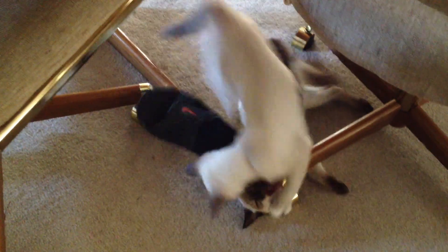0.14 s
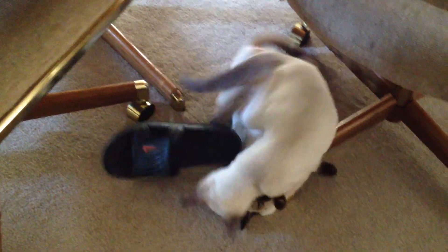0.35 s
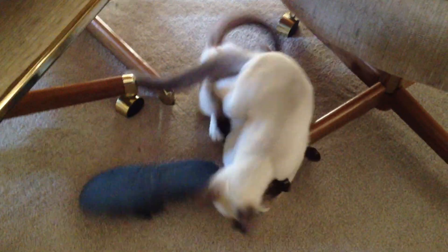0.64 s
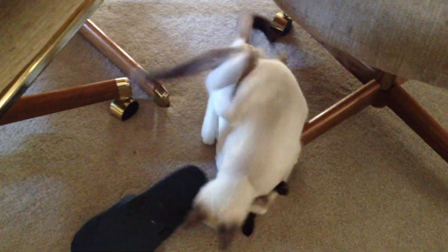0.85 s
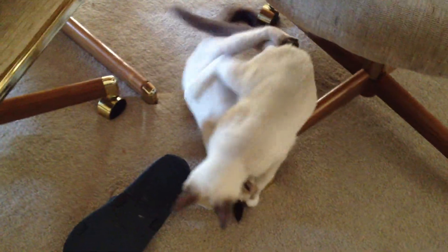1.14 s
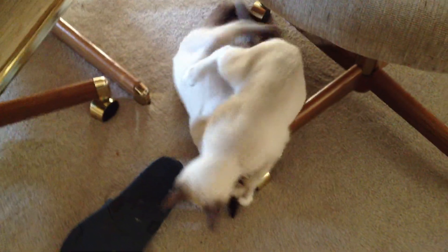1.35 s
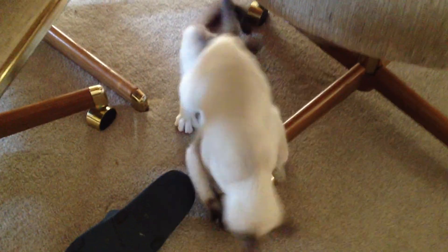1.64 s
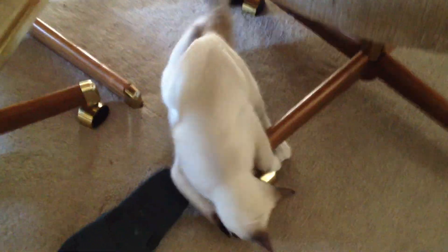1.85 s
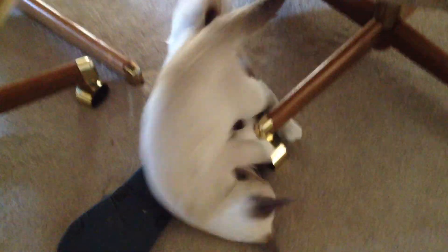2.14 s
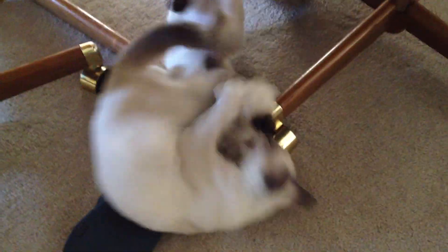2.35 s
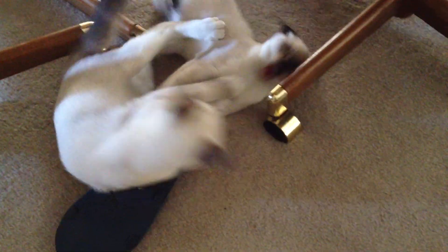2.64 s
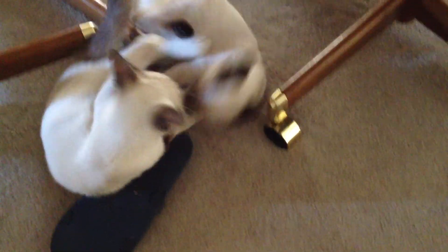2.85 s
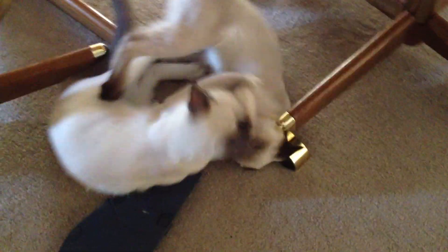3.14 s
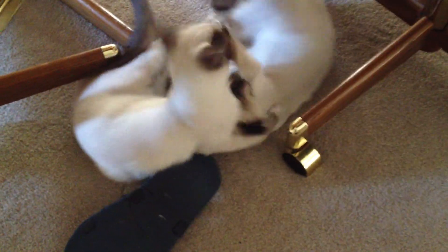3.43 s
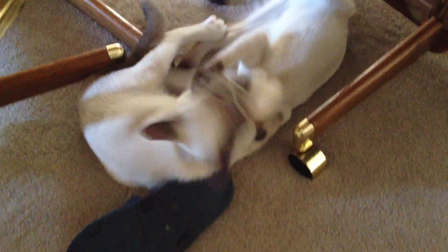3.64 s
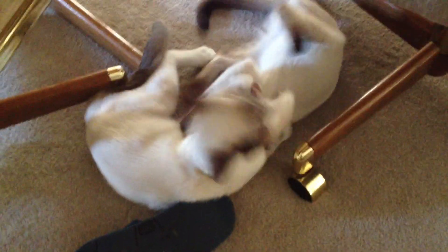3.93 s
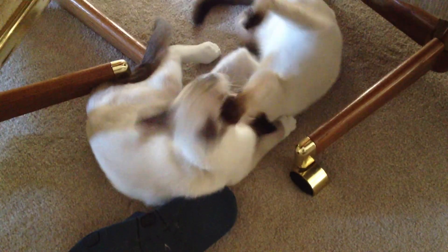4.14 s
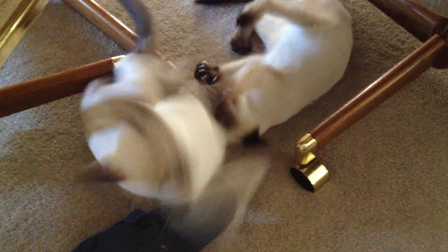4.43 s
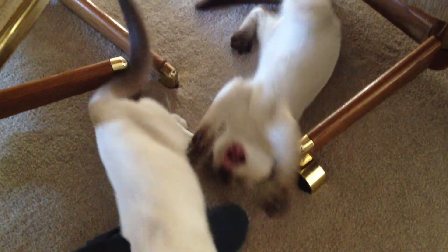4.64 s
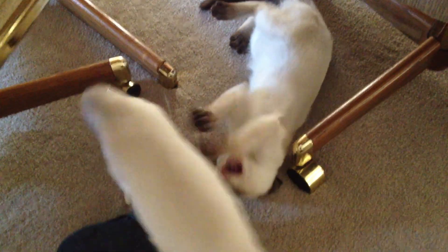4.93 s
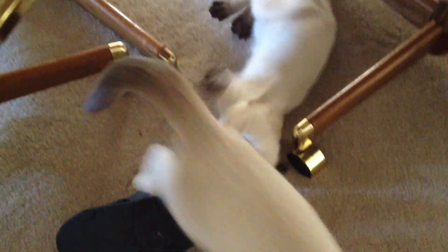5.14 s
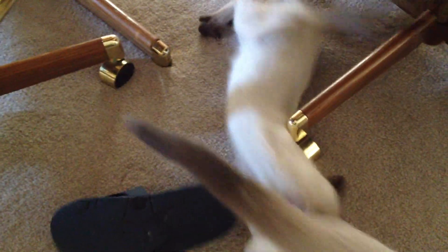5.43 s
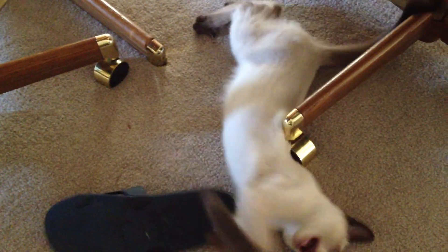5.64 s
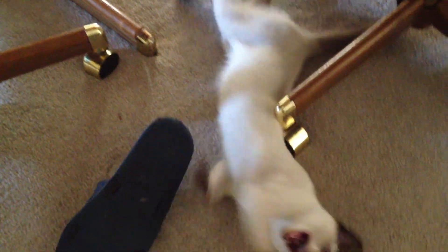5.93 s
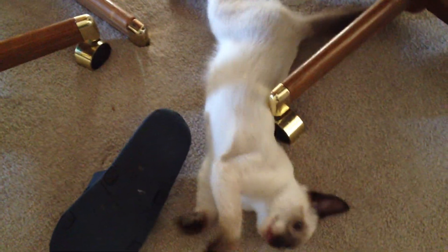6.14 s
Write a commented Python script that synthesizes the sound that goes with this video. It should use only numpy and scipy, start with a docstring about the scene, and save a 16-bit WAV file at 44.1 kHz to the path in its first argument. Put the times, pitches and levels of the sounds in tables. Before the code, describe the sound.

Two cats wrestle on a carpet among wooden furniture legs. A metal caster clacks as one cat starts a long yowl that rises, sinks and turns raspy. Scuffling follows, with two sharp, briefly ringing knocks on the legs, another clack, a further knock and a dull thud. Fur rustles and claws tick throughout, and a faint short hiss ends the bout. The sounds are close, in a quiet furnished room.

```python
"""Paws thud and fur rubs on a carpet as two cats wrestle among wooden furniture legs on brass casters.
One gives a long yowl, vocal-fold harmonics filtered by throat and mouth, that rises, sinks and frays
into a rasp as its force runs out. Casters clack, claws snag, a body drags over the pile, and knocks set
the legs ringing in their modes. A thin squeak slips out, and a short soft hiss of turbulent breath
ends the bout, in a quiet furnished room."""
import sys
import numpy as np
from scipy import signal
from scipy.fft import rfft, irfft
from scipy.io import wavfile

SR = 44100
rng = np.random.default_rng(int(sys.argv[2]) if len(sys.argv) > 2 else 0)


def to_wav(s):
    """Save 16-bit WAV."""
    ch = np.atleast_2d(s).T  # columns
    pcm = np.round(np.clip(ch, -1, 1) * 32767)  # PCM
    wavfile.write(sys.argv[1], SR, pcm.astype(np.int16))


N = 276948
TIME = np.arange(N) / SR

# bright noise spectrum of fur on the pile, also used for the casters' rattle: frequency_hz, density_db
BRIGHT_FRICTION = [(500, -4.5), (2300, 2), (4300, -6.5), (5500, -4.5), (6900, 9), (8500, -2), (14000, 2.5)]


def from_db(db):
    """Decibels to amplitude gain."""
    return 10 ** (np.asarray(db) / 20)


def rms_one(x):
    """Normalisation to unit rms."""
    return x / np.sqrt(np.mean(x ** 2) + 1e-20)


def in_time(rows):
    """Linear interpolation of each column of a timed table at every sample."""
    times, *columns = np.transpose(rows)
    return [np.interp(TIME, times, column) for column in columns]


def at_hz(points, hz, column=1):
    """Interpolation of one column of a spectrum on a log-frequency axis."""
    points = np.array(points)
    return np.interp(np.log(hz), np.log(points[:, 0]), points[:, column])


def during(start_s, end_s, fade_s=0.004):
    """A trapezoidal gate: one between two moments, with a fade at each end."""
    return np.clip(np.minimum(TIME - start_s, end_s - TIME) / fade_s, 0, 1)


def swell(middle_s, half_s):
    """A Gaussian envelope about a moment."""
    return np.exp(-((TIME - middle_s) / half_s) ** 2)


def decay(t, t60):
    """Exponential decay: 60 dB lost in t60 seconds."""
    return np.exp(-np.log(1000) * t / t60)


def after(start_s, length_s):
    """The samples that follow a moment, and the time since it."""
    span = slice(int(start_s * SR), min(N, int((start_s + length_s) * SR)))
    return span, TIME[span] - TIME[span.start]


def drift(rate_hz):
    """Low-passed noise: a random wander of unit rms at about this rate."""
    pole = np.exp(-16 * np.pi * rate_hz / SR)   # runs at an eighth of the sample rate
    slow = signal.lfilter([1], [1, -2 * pole, pole * pole], rng.standard_normal(N // 8 + 8002))[8000:]
    return np.interp(np.arange(N) / 8, np.arange(len(slow)), rms_one(slow))


def filtered(x, order, hz, kind):
    """Causal Butterworth filtering."""
    return signal.sosfilt(signal.butter(order, hz, kind, fs=SR, output="sos"), x)


def noise_bands():
    """White noise in third-octave bands, as pairs of centre_hz and samples."""
    edges, white = np.geomspace(30, 17000, 28), rng.standard_normal((2, N))
    return [(np.sqrt(low * high), filtered(white[k % 2], 2, [low, high], "band"))
            for k, (low, high) in enumerate(zip(edges, edges[1:]))]


def coloured(spectrum):
    """Spectral shaping: noise of unit rms with this spectrum."""
    hz = np.maximum(np.arange(N // 2 + 1) * SR / N, 1)
    return rms_one(irfft(rfft(rng.standard_normal(N)) * from_db(at_hz(spectrum, hz)), N))


def formant_gain(formants, hz):
    """Resonance: the summed gain of bell-shaped peaks at these frequencies."""
    return sum(from_db(db) / (1 + ((hz - centre) / width * 1.17) ** 2) for centre, width, db in formants)


def breath(formants):
    """Turbulence noise of unit rms, filtered by vocal-tract resonances."""
    hz = np.geomspace(100, 16000, 200)
    return coloured(np.c_[hz, 20 * np.log10(formant_gain(formants, hz))])


def room_tone(level_db=-63):
    """Stationary noise: the faint background of the room."""
    # spectrum of the quiet room: frequency_hz, density_db
    spectrum = [(30, -8), (60, -45), (108, -8.5), (224, 0.5), (378, -11.5), (503, -9), (745, -14),
                (2060, -19.5), (3300, -23), (7040, -21.5), (9600, -20), (14200, -14), (15400, -18)]
    return from_db(level_db) * coloured(spectrum)


def rubbing(fidget_hz=5.8, swing_db=6, lumpy_db=4.5, grainy_db=6.5):
    """Stick-slip friction: fur catches and slips on the pile, so the noise comes in uneven lumps."""
    # bodies sliding over the pile: middle_s, half_length_s, fur_db, weight_db
    slides = [(0.097, 0.064, -79.5, -49.5), (0.373, 0.088, -68, -49), (1.87, 0.47, -82, -69),
              (2.326, 0.032, -70, -68), (2.5, 0.082, -72, -74), (3.2, 0.2, -84, -55.5),
              (3.75, 0.16, -74, -64), (4.025, 0.064, -67, -88), (4.33, 0.022, -72.5, -84),
              (4.454, 0.035, -70.5, -78), (4.675, 0.027, -71.5, -54.5), (5.2, 0.046, -81, -60),
              (5.506, 0.074, -74, -54.5), (5.779, 0.018, -68, -72)]
    # dull spectrum of shifting weight: frequency_hz, density_db
    shuffle_spectrum = [(60, -69), (120, -2), (210, -4.5), (330, -2.5), (550, -12.5), (1200, -17),
                        (3000, -27)]
    fidget_db = swing_db * np.tanh(drift(fidget_hz))   # the cats never keep quite still
    fur = from_db(-82.5 + fidget_db) + sum(from_db(db) * swell(s, half) for s, half, db, _ in slides)
    weight = from_db(-65.5 + fidget_db) + sum(from_db(db) * swell(s, half) for s, half, _, db in slides)
    shuffle = coloured(shuffle_spectrum) * weight * from_db(-13 + lumpy_db * drift(23))
    rustle = coloured(BRIGHT_FRICTION) * fur * from_db(7 + grainy_db * np.tanh(drift(83)))
    return shuffle + rustle


def paw_thuds(slap_rise_s=0.003, thump_rise_s=0.023, sink_s=0.00217, spot_spread=0.03):
    """Impact excitation: the pad slaps the floor's high modes, then the weight drives its low ones."""
    # paws and bodies landing on the carpet: start_s, thump_db, slap_db
    landings = [(.053, -52, -48.5), (.073, -42, -74), (.178, -49, -47), (.325, -42, -48),
                (.375, -40.5, -46.5), (1.506, -76, -37), (1.525, -38.5, -83), (1.769, -63.5, -49),
                (3.203, -42.5, -76), (3.794, -46, -61), (3.837, -51.5, -53.5), (3.904, -32.5, -38),
                (4.5361, -25.5, -28), (4.588, -45, -70), (4.844, -52, -75), (5.448, -55, -44.5),
                (5.515, -52, -54), (5.655, -53, -65), (5.841, -53, -53.5)]
    # modes of the carpeted floor: frequency_hz, level_db, t60_s
    floor_modes = [(187, -7.5, 0.11), (221.6, 5.5, 0.037), (347.5, -11, 0.082), (591.4, -1.5, 0.019),
                   (757, -4, 0.018), (990, -4.5, 0.019), (1180, -4, 0.015), (1820, -18.5, 0.019)]
    out = np.zeros(N)
    for start_s, thump_db, slap_db in landings:
        for hz, mode_db, t60 in floor_modes:
            heavy = hz < 420
            span, t = after(start_s + sink_s * heavy, .2)
            level_db, rise_s = (thump_db + 1.5, thump_rise_s) if heavy else (slap_db + 3.5, slap_rise_s)
            tuning = 1 + rng.normal(0, spot_spread)   # each spot rings a little differently
            ring = np.sin(2 * np.pi * hz * tuning * t) * decay(t, t60)
            out[span] += from_db(level_db + mode_db) * ring * (1 - decay(t, rise_s))
    return filtered(out, 4, 140, "high")   # the thuds carry little deep bass


def roughness(throat_db, mouth_db, firm_rasp=0.1386, full_force_db=-45, doubling_db=7.5):
    """Aperiodic phonation, from 0 to 1: the weaker the voice, the less evenly the folds beat."""
    force_db = 20 * np.log10(np.hypot(from_db(throat_db), from_db(mouth_db)))
    return np.clip(firm_rasp * 2 ** ((full_force_db - force_db) / doubling_db), 0, 1)


def yowl(jitter=0.0113, rough_jitter=0.0464, shimmer=0.55, period_doubling=0.083, clear_hz=5700):
    """Source and filter: vocal-fold harmonics glide through the formants of throat and mouth."""
    # vibration rate of the folds: time_s, pitch_hz
    melody = [(.21, 724), (.28, 777), (.32, 889), (.38, 884.4), (.414, 1042), (.475, 1097), (.526, 1017),
              (.556, 864), (.626, 790), (.7, 663), (.82, 611), (.86, 642), (1.0, 617.7), (1.075, 586),
              (1.125, 516), (1.16, 498.5), (1.22, 540.4), (1.27, 509.5), (1.45, 476), (1.49, 533),
              (1.65, 549.6)]
    # force of the voice and of the overtones the open mouth lets out: time_s, throat_db, mouth_db
    force = [(0.215, -59.5, -73), (.29, -63.5, -58), (.358, -62.5, -51), (.475, -54, -54.5),
             (.584, -49, -58.5), (.7, -53, -67.5), (.77, -57, -58.5), (.83, -61, -61.5), (.996, -51, -63),
             (1.04, -56, -80), (1.102, -56, -84), (1.133, -45, -69.5), (1.3, -45.5, -74), (1.37, -53, -89),
             (1.459, -58.5, -80), (1.659, -65, -86)]
    # formants of throat and mouth before tuning: centre_hz, width_hz, gain_db
    throat = [(1250, 750, -8), (2300, 194, 3.5), (2505, 210, 1.5)]
    mouth = [(4356, 230, -3.5), (7000, 2200, -13.5)]
    # the jaw tunes the throat's formants: time_s, frequency_ratio
    jaw_tuning = [(.25, 1.02), (.45, 0.77), (.57, 1.09), (.66, 0.97), (.9, 0.92), (1.06, 0.96), (1.6, 0.87)]
    start_s, end_s = force[0][0], force[-1][0]
    span, _ = after(0, end_s)
    throat_db, mouth_db = in_time(force)
    rasp = roughness(throat_db, mouth_db)
    pitch = in_time(melody)[0] * (1 + jitter * drift(47) + rough_jitter * rasp * drift(220))
    phase = 2 * np.pi * np.cumsum(pitch) / SR
    # strained folds beat strong and weak in turn
    flutter = 1 + rasp * (shimmer * drift(110) + period_doubling * np.cos(phase / 2))
    harmonics = np.arange(1, 17)[:, None]
    partials, partial_hz = np.sin(harmonics * phase[span]), harmonics * pitch[span]
    # as the head twists, each harmonic swells and fades on its own, the high ones more
    waver = from_db(.8 * np.log2(2 * harmonics) * np.array([drift(40)[span] for _ in harmonics]))
    rolloff = np.sqrt(1 + (partial_hz / clear_hz) ** 8)
    tone_share = np.sqrt(1 - .7 * rasp[span] ** 2)   # a rough tone breaks up into air
    jaw = in_time(jaw_tuning)[0][span]
    lips = (pitch[span] / 850) ** .16   # the lips draw back on high notes
    out = np.zeros(N)
    for formants, tuning, level_db, air_gain in ((throat, jaw, throat_db, .57), (mouth, lips, mouth_db, 1.3)):
        gains = formant_gain(formants, partial_hz / tuning) * waver / rolloff
        tone = np.sum(gains * partials, axis=0) / np.sqrt(np.sum(gains ** 2, axis=0) / 2)
        air = air_gain * rasp * breath(formants) * (1 + .5 * np.cos(phase))   # one puff a cycle
        out[span] += (tone_share * tone * flutter[span] + air[span]) * from_db(level_db[span])
    return out * during(start_s, end_s)


def caster_clacks(rattle_db=-17, rattle_t60=0.056, rise_s=0.012):
    """Free vibration: a caster is knocked, then rings and rattles briefly."""
    # clacks of the casters: start_s, level_db, pitch_ratio, ring_time_ratio
    clacks = [(0.2593, -23.5, 1.0, 0.73), (3.374, -39.5, 1.51, 0.98)]
    # modes of a brass caster: frequency_hz, level_db, t60_s
    modes = [(1373, -22, 0.03), (2543, 4.5, 0.019), (4020, 1, 0.011), (4080, -10, 0.025),
             (4310, 2.5, 0.011), (6110, -7, 0.0091), (7450, -4, 0.022), (8300, -5, 0.022),
             (8540, 4.5, 0.007)]
    out = np.zeros(N)
    for start_s, level_db, tuning, length in clacks:
        span, t = after(start_s, .1)
        ring = sum(from_db(db) * np.sin(2 * np.pi * hz * tuning * t) * decay(t, t60 * length)
                   for hz, db, t60 in modes)
        rattle = from_db(rattle_db) * coloured(BRIGHT_FRICTION)[span] * decay(t, rattle_t60)
        out[span] += from_db(level_db + 3.5) * (ring + rattle) * (1 - decay(t, rise_s))
    return out


def claw_snags(bands, snap_t60=0.046, tick_t60=0.0025, tick_db=2):
    """Broadband transients: each dry snap is led by the tick of the claw's tip."""
    # claws snagging and tapping: start_s, body_db, edge_db
    snags = [(1.506, -40.5, -53), (2.246, -46, -55.5), (2.359, -62, -53), (2.475, -44.5, -47.5),
             (2.492, -55, -50), (2.605, -27, -42), (3.375, -29.5, -43.5), (3.795, -44.5, -48.5),
             (4.298, -54, -55.5), (4.538, -42, -44), (5.167, -53, -57), (5.409, -43, -54),
             (5.512, -43, -46), (5.537, -64, -45)]
    # spectrum of a claw's snap: frequency_hz, density_db
    spectrum = [(200, -21), (1100, -7), (2500, -11), (3900, -16), (5200, -7), (7200, 1), (10000, -15),
                (15000, -4.5)]
    out = np.zeros(N)
    for start_s, body_db, edge_db in snags:
        span, t = after(start_s, .1)
        envelope = decay(t, snap_t60) + from_db(tick_db) * decay(t, tick_t60)
        for hz, noise in bands:
            gain_db = at_hz([(3800, body_db), (6000, edge_db)], hz) + at_hz(spectrum, hz) + 5
            out[span] += from_db(gain_db) * noise[span] * envelope
    return out


def body_drag(start_s=1.713, end_s=2.1, level_db=-62):
    """Sliding friction: a body drags once across the carpet with a nearly even noise."""
    # spectrum of the drag: frequency_hz, density_db
    spectrum = [(200, -31), (500, 1), (1100, -2.5), (2000, -0.5), (3200, -10), (5000, -14.5), (9000, -13)]
    return coloured(spectrum) * from_db(level_db + 1.3 * drift(60)) * during(start_s, end_s, fade_s=0.083)


def leg_knocks(bands, hard_db=-29.5, hard_contact_s=0.0055, spot_db=8.5, spot_octaves=0.33):
    """Modal ringing: each blow excites a crack and the frame's modes; a cat leaning on it damps them."""
    # blows on the furniture legs: start_s, force_db, sharpness_db, favoured_hz, ring_time_ratio
    blows = [(2.265, -60.5, -5, 1050, 0.87), (2.611, -32.5, -6.5, 1430, 0.78),
             (2.784, -30.5, 10, 1370, 0.75), (3.194, -51, -15, 1280, 0.86), (3.208, -54, -13, 1400, 0.76),
             (3.293, -59.5, -9, 1440, 1), (3.413, -56.5, -9, 1030, 0.63), (3.616, -63.5, 2, 1103, 0.45),
             (3.894, -51, -9, 1070, .7), (3.902, -33.5, -5.5, 2050, 0.58), (5.448, -53.5, -1, 1270, 0.27)]
    # main modes of the frame: frequency_hz, level_db, t60_s
    modes = [(232.6, -2, 0.63), (506, -2, 0.21), (581, -3.5, 0.41), (1066, -11, 0.43), (1190, -5.5, 0.12),
             (1300, -8, 0.3), (1360, -12.5, 0.33), (1450, -13, 0.36), (1477, -6.5, 0.27), (1777, -7, 0.15),
             (1842, -10, 0.57), (2060, -28, 0.11), (2220, -34, 0.23), (2640, -9.5, 0.19), (3580, -30, 0.09),
             (4240, -11, 0.14), (4630, -23, 0.54), (5839, -37, .12), (6510, -2, 0.05), (7030, 2, 0.052),
             (7680, 3.5, 0.063), (8840, 1, 0.025)]
    # its dense weaker modes, heard as noise: frequency_hz, density_db, t60_s
    clatter = [(90, -55, 0.28), (222, -0.5, 0.44), (410, 4, 0.36), (720, -10.5, 0.59), (890, -6.5, 0.46),
               (1330, -10.5, 0.49), (2020, -9, 0.42), (3080, -15.5, 0.44), (5950, -25, 0.5),
               (7640, -18, 0.47), (9400, -25, 0.2), (14900, -26, 0.3)]
    out = np.zeros(N)
    for start_s, force_db, sharpness_db, favoured_hz, ring_ratio in blows:
        span, t = after(start_s, .4)
        # soft blows press for longer and are duller: the bass follows only part of a change in force
        attack = 1 - decay(t, hard_contact_s * 2 ** ((hard_db - force_db) / 18.5))
        bass_db = -39.5 + .59 * (force_db - hard_db)
        spectrum = [(550, bass_db), (900, force_db), (3000, force_db), (4200, force_db + sharpness_db)]

        def drive_db(hz):
            """Excitation spectrum: the struck spot favours one band of the blow."""
            return at_hz(spectrum, hz) + spot_db * np.exp(-(np.log2(hz / favoured_hz) / spot_octaves) ** 2)

        for hz, mode_db, t60 in modes:
            strength = from_db(drive_db(hz) + mode_db + rng.normal(-2.5, 0.73)) * rng.choice([-1, 1])
            out[span] += strength * np.sin(2 * np.pi * hz * t) * decay(t, t60 * ring_ratio) * attack
        for hz, noise in bands:
            crack = from_db(10.5) * hz / (hz + 2500) * decay(t, t60=0.083)
            wash = decay(t, at_hz(clatter, hz, column=2) * ring_ratio)
            strength = from_db(drive_db(hz) + at_hz(clatter, hz) + 11)
            out[span] += strength * noise[span] * (crack + wash) * attack
    return filtered(out, 3, 120, "high")   # the knocks carry hardly any bass


def squeak(jitter=0.004):
    """Frequency modulation: a thin, nearly pure tone traces a brief arch of pitch."""
    # course of the squeak: time_s, pitch_hz, level_db
    arch = [(4.755, 4150, -92), (4.772, 4370, -66), (4.79, 4180, -72), (4.81, 4010, -85)]
    pitch, level_db = in_time(arch)
    phase = 2 * np.pi * np.cumsum(pitch * (1 + jitter * drift(100))) / SR
    return np.sin(phase) * from_db(level_db) * during(arch[0][0], arch[-1][0])


def cat_hiss(middle_s=6.18, half_s=0.043, level_db=-60.5):
    """Turbulence: unvoiced air rushes through the open mouth."""
    # formants of the hissing mouth: centre_hz, width_hz, gain_db
    formants = [(2360, 300, -0.5), (4560, 300, -10), (6660, 1500, -6.5)]
    return breath(formants) * from_db(level_db) * swell(middle_s, half_s)


def reverberation(x, t60=0.26, absorbed_above_hz=7700):
    """Diffuse reflection: a short tail, dulled by absorption in carpet and upholstery."""
    t = TIME[:SR // 2]
    tail = rng.standard_normal(len(t)) * decay(t, t60) * (t > .004)
    tail = filtered(tail / np.sqrt(np.sum(tail ** 2)), 1, absorbed_above_hz, "low")
    return signal.fftconvolve(x, tail)[:N]


def scene():
    """Superposition: the cats, the furniture and the room add in one channel."""
    bands = noise_bands()
    voice = yowl() + squeak() + cat_hiss()
    thuds = paw_thuds()
    snaps = caster_clacks() + claw_snags(bands)
    knocks = leg_knocks(bands)
    echo = reverberation(from_db(-10.5) * voice + from_db(-9.5) * thuds + from_db(-6) * snaps)
    return (room_tone() + rubbing() + thuds + voice + snaps + body_drag() + knocks + echo)[None]


def record(dry, bass_hz=65, shelf_hz=8900, shelf_db=-8.5, dip_hz=9900, dip_share=0.49, cutoff_hz=15450):
    """Band limiting: a small microphone loses deep bass; its treble steps down, dips and is cut off."""
    below = signal.sosfiltfilt(signal.butter(14, shelf_hz, fs=SR, output="sos"), dry)
    shelved = below + from_db(shelf_db) * (dry - below)
    notched = signal.lfilter(*signal.iirnotch(dip_hz, Q=2.16, fs=SR), shelved)
    dipped = shelved + dip_share * (notched - shelved)
    thinned = filtered(dipped, 2, bass_hz, "high")
    return signal.sosfilt(signal.ellip(10, .2, 70, cutoff_hz, fs=SR, output="sos"), thinned)


dry = scene()
out = record(dry)
to_wav(out)
```